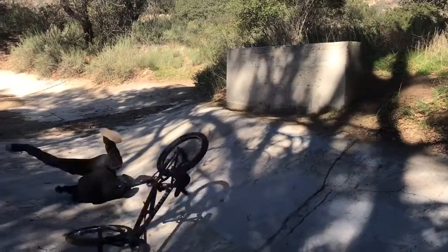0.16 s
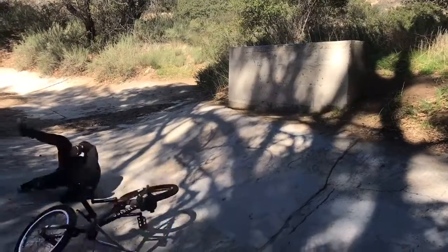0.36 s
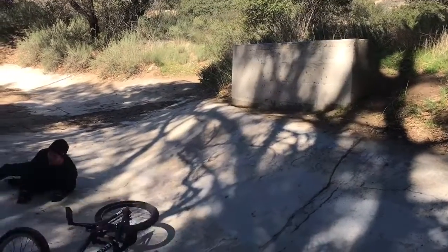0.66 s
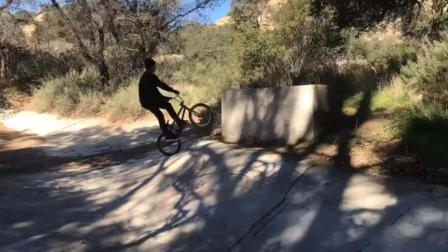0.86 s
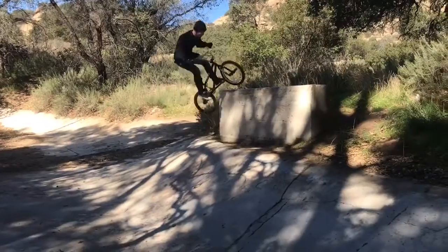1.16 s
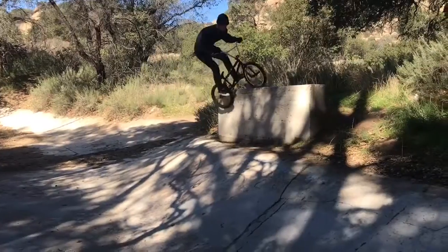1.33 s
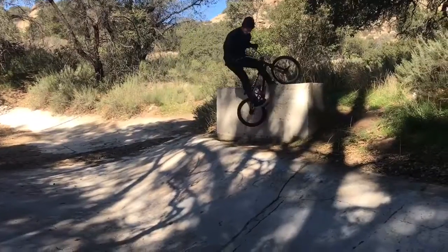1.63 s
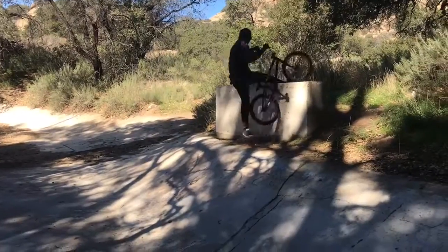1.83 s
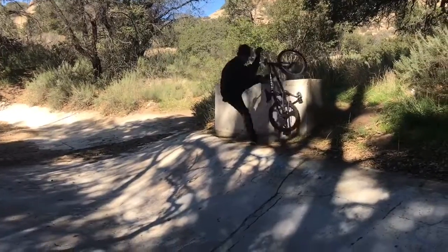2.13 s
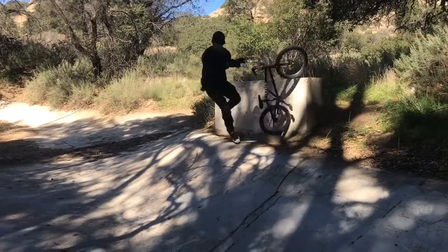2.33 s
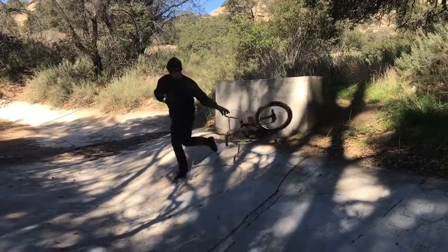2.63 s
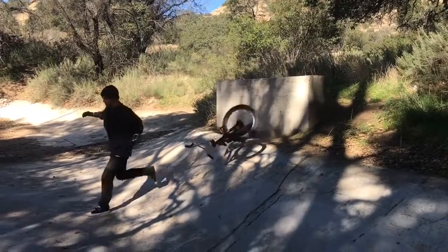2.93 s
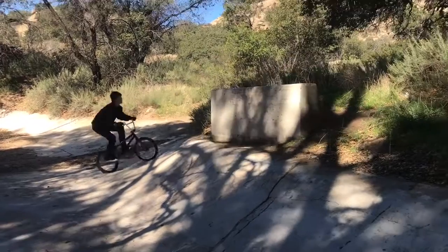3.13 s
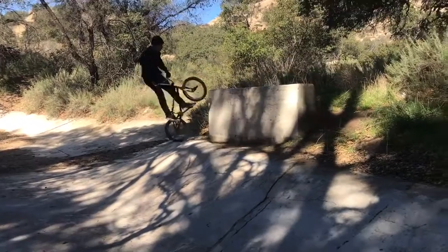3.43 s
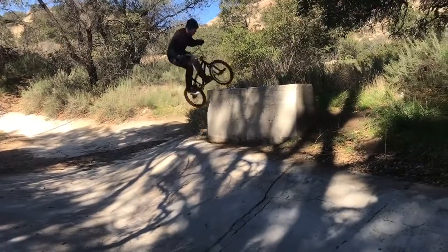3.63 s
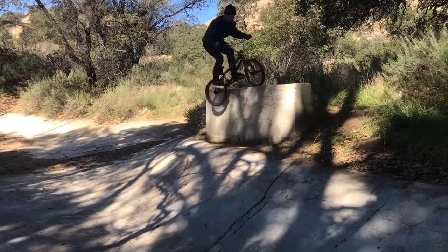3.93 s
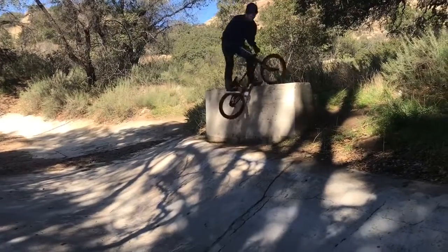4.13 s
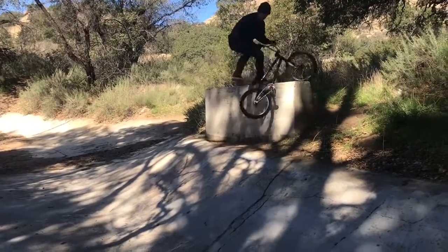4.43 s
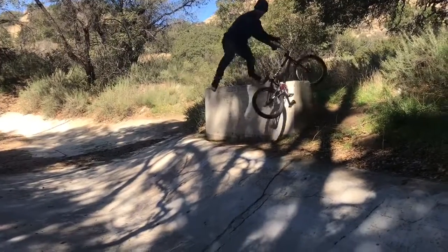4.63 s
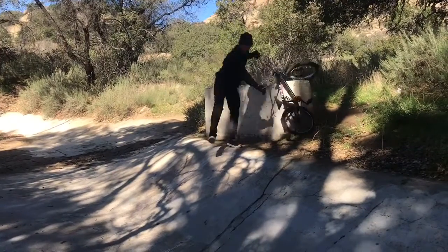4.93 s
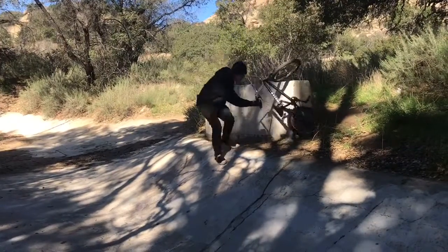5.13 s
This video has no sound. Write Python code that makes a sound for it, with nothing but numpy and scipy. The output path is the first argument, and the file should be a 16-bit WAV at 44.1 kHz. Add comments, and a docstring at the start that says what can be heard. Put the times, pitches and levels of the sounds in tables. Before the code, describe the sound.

A phone-microphone sound of a stunt bike falling on concrete outdoors, in three abruptly joined attempts. From 0 s metal grinds over crackling sand close by; sharp clacks and body thuds cluster at 0.32-0.42, with big bangs at 0.66 and 0.91 and rattling scrapes between. The level dips briefly at 0.95. From 1.14 to 1.48 a freewheel ticks quickly and faintly, speeding up; then frame and pegs clack and scrape at 1.48-1.73, with smaller knocks and a thud to 2.2. A short scuff comes at 2.35, then a quieter stretch, before a hard double clatter near 2.87, a small ping and a knock at 3.09. Another dip at 3.18, a soft low thud at 3.33, ticking at 3.53-3.87, then lighter clacks and gritty scrapes from 3.93 to 4.7, faint steel ringing, and dull little knocks at 5.1-5.2. Short concrete echo, faint breeze, low rumble and distant two-tone hum throughout.

```python
"""Stunt bike crashing in a concrete ditch

Outdoors on concrete, three attempts end in crashes: the first close by, the later ones at a ledge further off.
Frame, pegs and bars clack as bursts of filtered contacts, and grind as long runs of them over crackling sand.
Tyres, shoes and body thud and small steel parts ping as damped tones; the hub ticks in noise snaps in mid-air.
The banks answer as decaying noise, over a faint breeze, low rumble and a distant two-tone drone.
A phone's microphone colours it all."""
import sys
import numpy as np
from scipy import signal
from scipy.fft import rfft, irfft, next_fast_len
from scipy.io import wavfile
from scipy.ndimage import map_coordinates

SR = 44100
rng = np.random.default_rng(int(sys.argv[2]) if len(sys.argv) > 2 else 0)


def materialize(psi):
    """Save the field psi as 16-bit PCM at rate SR to the path in sys.argv[1].

    A 1-D psi becomes a single channel; in a 2-D psi each row is a channel.
    """
    bounded = np.clip(np.atleast_2d(psi).T, -1, 1)
    quanta = np.round(bounded * 32767).astype(np.int16)
    wavfile.write(sys.argv[1], SR, quanta)


N = 232715
TIME = np.arange(N) / SR
AGE = np.arange(SR // 2) / SR  # half a second counted from an event

# starts of the three attempts, then the end of the last: start_s
ATTEMPT_STARTS = [0, .95, 3.182, 5.3]
DIP_DB, FADE_OUT_S, FADE_IN_S = -29.5, 0.028, 0.036  # the level dips between attempts

# distant drone: time_s, deep_tone_db, upper_tone_db
DRONE_LEVELS = [(0, -47, -42.5), (.93, -62, -76), (1.0, -43.5, -49), (1.5, -39, -63.5), (3.0, -39, -53.5),
                (3.4, -47, -55), (4.6, -61, -47), (5.28, -41, -51.5)]
# spectrum shape of the breeze: frequency_hz, relative_level_db
BREEZE_SPECTRUM = [(100, -9), (260, -3), (500, -2), (800, -7), (1300, -11.5), (2000, -23), (3500, -22),
                   (6000, -33.5), (10000, -53.5), (15500, -31.5)]
# spectrum shape of the low rumble: frequency_hz, relative_level_db
RUMBLE_SPECTRUM = [(20, -40.5), (35, 1), (55, -3.5), (100, 0.5), (150, -11), (300, -16), (800, -47)]

# bike sliding or rolling on concrete:
# start_s, length_s, mid_slide_grind_db, grit_db (relative to the grind), run_out_t60_s
SLIDES = [(0, 0.21, -37, -3.5, 1), (0.326, .16, -33.5, -4, 0.874), (0.534, 0.35, -39.5, -0.5, 0.33),
          (0.828, 0.075, -37.5, -8.5, 0.323), (0.957, 0.026, -49.5, -9, .6), (1.48, 0.3, -38, -5, 0.4),
          (1.716, 0.032, -26, -11.5, 0.16), (1.852, 0.11, -45.5, -10, 0.24),
          (2.057, 0.15, -38.5, -8.5, 0.19), (2.234, 0.52, -54, -10, .4), (2.807, 0.017, -43, 0.5, 0.18),
          (2.884, 0.047, -32.5, -6.5, 0.65), (2.99, 0.18, -45.5, 4, 0.12), (3.201, 0.22, -48, -6, 0.59),
          (3.872, 0.17, -44.5, -5, 0.45), (4.197, 0.14, -37, -4.5, 0.18), (4.352, .11, -41, -8, 0.49),
          (4.625, 0.11, -46.5, -4, 0.54), (4.83, 0.043, -55.5, 5, 0.64), (5.109, 0.11, -46.5, -4.5, 0.31)]
BITE_S, SLOWING_DB_PER_S = 0.011, 5.5  # a slide bites quickly and weakens as the bike slows
# spectrum shape of metal grinding on concrete: frequency_hz, relative_level_db
GRIND_SPECTRUM = [(60, -34), (110, -7.5), (220, 0.5), (450, -7.5), (700, 0.5), (900, -1.5), (1400, -5),
                  (2400, -6), (4000, -8.5), (9000, -43)]
# spectrum shape of sand under the bike: frequency_hz, relative_level_db
GRIT_SPECTRUM = [(1200, -26.5), (2700, -13.5), (4000, -14), (5200, -1.5), (7500, -1), (10300, -6.5),
                 (12500, -2), (15500, -8.5)]
# broad resonances of frame and wheels: frequency_hz, width_hz, typical_level_db
FRAME_RESONANCES = [(293, 73, -3), (670, 200, -3), (776, 51, -18), (1200, 290, -5), (1440, 120, -11.5),
                    (1845, 270, -7), (2310, 81, -8.5), (2804, 160, -6.5), (3310, 120, -12),
                    (3815, 740, -4.5), (4530, 250, -10), (5970, 640, -11.5), (6800, 630, -17.5),
                    (9200, 2500, -9.5)]
RATTLES_PER_S, RATTLE_T60_S, RATTLE_DB = 55, 0.022, -6.5  # loose chain and cables; level relative to grind

# blows of bike on concrete:
# start_s, strength_db, struck_part_pitch_hz, chatter_t60_s (before a common scaling in clacks),
# knock_db, crack_db (both relative to the strength)
BLOWS = [(0.056, -29, 2760, .09, -9, -1.5), (0.324, -23, 970, 0.098, -31, -1.5),
         (0.347, -26, 1510, 0.091, -7, -6), (0.369, -34.5, 885, 0.0257, -4, 7.5),
         (0.4, -22, 2000, 0.01386, -15, -14.5), (0.42, -11.5, 3500, .026, -13.5, -10.5),
         (0.655, -9, 944, 0.071, -13, -4.5), (0.861, -24.5, 920, 0.15, 2, -3),
         (0.89, -32, 810, .06, 4.5, 2.5), (0.9057, -9.5, 1940, 0.066, -7.5, -9.5),
         (1.484, -17.5, 1343, .02, -16.5, -11), (1.531, -28, 900, 0.16, -4.5, -10),
         (1.564, -29.5, 1210, 0.038, -8, -7), (1.594, -20, 1110, 0.083, -10.5, -8.5),
         (1.726, -18.5, 2330, 0.036, -7, -2.5), (1.846, -24, 2060, .08, -12.5, -8),
         (1.908, -32, 2940, 0.074, -16.5, -7.5), (2.027, -34, 3330, .028, -23, -12),
         (2.038, -26.5, 870, .02, 4, -13), (2.105, -34, 1230, .042, -17, -10),
         (2.13, -31.5, 2220, 0.12, -30, -13.5), (2.171, -30, 1450, 0.027, -30, -7.5),
         (2.201, -40, 2400, .06, -15, 2), (2.616, -41, 740, 0.068, 3.5, -7),
         (2.801, -29.5, 780, 0.037, 0, -8.5), (2.86, -22.5, 796, 0.082, -2, -1.5),
         (2.872, -16, 4140, 0.051, -9, -12.5), (2.887, -16.5, 796, 0.073, -12, -8),
         (3.0941, -20.5, 714, 0.017, 5.5, -17.5), (3.93, -28.5, 1620, 0.06, -24, -12),
         (3.962, -31.5, 696, 0.055, -21, -19.5), (4.162, -37.5, 1210, 0.085, -9, -17),
         (4.194, -28.5, 2980, 0.049, -4.5, -6), (4.283, -43.5, 1110, .09, -22, 0),
         (4.301, -29.5, 1070, .035, -25, -7), (4.31, -29, 3100, .061, -10, -0.5),
         (4.323, -25.5, 2970, 0.032, -7, -8), (4.397, -34.5, 1130, .072, -11, -9.5),
         (4.439, -32, 680, 0.098, -12, -10), (4.506, -29.5, 2980, .047, -19, -9),
         (4.593, -36, 3400, 0.068, -19, -14), (4.631, -27.5, 3250, 0.1, -14, -8.5),
         (4.691, -36.5, 1900, 0.054, -33, -11), (4.831, -35.5, 2550, 0.061, -9.5, -3.5),
         (5.08, -39.5, 1090, 0.042, 4.5, -9.5), (5.102, -38, 1490, .025, -4, -12.5),
         (5.122, -36.5, 1230, .03, -3, -16.5), (5.203, -33, 1140, 0.037, 2.5, -21.5)]
# spectrum shape of the bright crack: frequency_hz, relative_level_db
CRACK_SPECTRUM = [(2500, -33), (4200, 2), (6500, 3.5), (8500, 1.5), (10300, -3.5), (12500, 0), (15500, -3)]
# short skids of rubber and metal: start_s, nominal_length_s, level_db (before the swell)
SKIDS = [(0.068, 0.014, -26), (1.249, 0.037, -52), (1.469, 0.018, -39), (1.988, 0.015, -37.5),
         (2.35, 0.041, -32), (3.622, 0.027, -50)]
REBOUND_S, REBOUND_DB, REBOUND_T60_S = .044, -20.5, 0.059  # the bike falls back after a blow
# lasting ring of the steel tubes: pitch_hz, relative_level_db, t60_s
TUBE_MODES = [(1433, -4, 0.63), (1720, -3.5, 0.79), (1890, 3.5, 0.23), (2110, -2, 0.36), (2707, -3, 0.19),
              (3700, 4, 0.45), (4300, -14, 0.74)]
# decay of the answer from the concrete banks: frequency_hz, t60_s
BANK_DECAY = [(150, 0.6), (1000, 0.57), (4000, 0.23), (14000, 0.65)]

# tyres, shoes and body landing: start_s, level_db (before the attack), pitch_hz, t60_s
THUDS = [(.322, -10.5, 322, 0.031), (.402, -17.5, 116, 0.13), (.424, -9, 143, 0.036),
         (.658, -7.5, 175, 0.038), (.664, -22, 75, .19), (.83, -25.5, 95, 0.11), (.908, -18, 220, 0.081),
         (1.732, -32, 121, 0.087), (2.056, -17, 113, 0.078), (2.778, -25, 91, 0.17),
         (2.872, -11, 147, 0.047), (3.097, -19, 216, 0.023), (3.326, -22, 73, 0.076),
         (3.937, -25, 97, 0.15), (5.102, -25, 128, 0.044), (5.126, -21, 84, .088), (5.203, -29, 70, 0.089)]
# air ringing inside a bounced tyre: start_s, level_db (before the attack)
TYRE_BOUNCES = [(0.336, -25), (0.502, -30), (0.662, -30.5), (2.873, -24.5)]
TYRE_HZ, TYRE_T60_S = 226, .55

# bike coasting through the air: start_s, length_s, hub_level_db (halfway through the spin-up)
COASTS = [(1.141, .34, -53), (3.534, .34, -53)]
SLOW_TICKS_PER_S, FAST_TICKS_PER_S, SPIN_UP_S = 38, 106, .24
TICK_RISE_DB = 6  # from slowest to fastest

# small steel parts and tubes: start_s, level_db (before the attack), pitch_hz, t60_s
PINGS = [(2.94, -25, 4860, .07), (4.632, -56.5, 4400, 3.9), (4.833, -56, 1400, 3.7),
         (4.833, -57, 1631, 1.1), (4.833, -59.5, 3914, 1.7), (5.027, -35, 7330, 0.052),
         (5.027, -42, 9120, 0.075)]

# response of the phone's microphone: frequency_hz, gain_db
MICROPHONE_RESPONSE = [(360, -1), (480, -3.5), (620, 0), (800, -0.5), (1650, -0.5), (1950, -0.5),
                       (2400, -1), (10000, -2.5), (13000, 0.5)]
TOP_HZ = 16100  # upper band limit


def amp(db):
    """Decibels to gain."""
    return 10 ** (np.asarray(db) / 20)


def unit(x):
    """Scale to rms 1."""
    return x / np.sqrt(np.mean(x ** 2) + 1e-20)


def blow(x):
    """Scale to the energy of 10 ms at rms 1."""
    return x / np.linalg.norm(x) * np.sqrt(SR / 100)


def fade(t, t60):
    """Exponential decay by 60 dB in each t60, with t60 at least .002."""
    return 1000 ** (-t / np.maximum(t60, .002))


def along(points, hz):
    """Read a curve of (Hz, value) points on a log frequency axis."""
    point_hz, value = np.transpose(points)
    return np.interp(np.log(hz + 1), np.log(point_hz + 1), value)


def curves(rows):
    """One value per sample for each column after the time."""
    time_s, *columns = np.transpose(rows)
    return [np.interp(TIME, time_s, column) for column in columns]


def wobble(rate):
    """A smooth random curve, rate knots a second."""
    knots = rng.standard_normal(int(N * rate / SR) + 4)
    return map_coordinates(knots, [TIME * rate])


def add(track, s, sound):
    """Mix a sound into a track at a time in seconds."""
    part = track[max(round(s * SR), 0):][:len(sound)]
    part += sound[:len(part)]


def colour(x, gain):
    """Causal (minimum-phase) filter with a given gain over frequency."""
    m = 2 * next_fast_len(len(x) // 2 + 2048)
    wanted = np.maximum(gain(np.fft.rfftfreq(m, 1 / SR)), 1e-6)
    cepstrum = irfft(np.log(wanted))
    # folding the cepstrum onto positive time makes the filter causal
    cepstrum[1:m // 2] *= 2
    cepstrum[m // 2 + 1:] = 0
    return irfft(rfft(x, m) * np.exp(rfft(cepstrum)))[:len(x)]


def hump(hz, centre_hz, q):
    """Gain of one broad resonance."""
    return 1 / np.hypot(1, q * ((hz + 1) / centre_hz - centre_hz / (hz + 1)))


def band(hz, low_hz, high_hz):
    """Gain of a steep band-pass."""
    return 1 / np.sqrt((1 + (low_hz / (hz + 1)) ** 10) * (1 + (hz / high_hz) ** 10))


def frame(hz, vary_db, between_db):
    """The frame's resonances, each excited more or less by the point of contact."""
    gain = amp(between_db)
    variations = rng.normal(0, 1, len(FRAME_RESONANCES)) * vary_db
    for (centre_hz, width_hz, db), variation in zip(FRAME_RESONANCES, variations):
        gain = gain + amp(db + variation) / (1 + (2 * (hz - centre_hz) / width_hz) ** 2)
    return gain


def grains(size, rate, spread_db):
    """Tiny contacts at random times with uneven sizes."""
    contact = rng.random(size) < rate / SR
    return contact * rng.standard_normal(size) * amp(spread_db * rng.standard_normal(size))


def rings(rows, attack):
    """One damped tone for each row, with a soft attack in seconds and cut after half a second."""
    out = np.zeros(N)
    for s, db, hz, t60 in rows:
        tone = np.sin(2 * np.pi * hz * AGE) * fade(AGE, t60)
        add(out, s, amp(db) * tone * (1 - np.exp(-AGE / attack)))
    return out


def drone_tone(hz, drift):
    """A distant tone wavering in pitch (drift scales it in Hz) and in level."""
    phase = 2 * np.pi * np.cumsum(hz + drift * wobble(10)) / SR
    return np.sqrt(2) * np.sin(phase) * amp(wobble(16))


def air_noise(spectrum):
    """Steady noise of rms 1 with the given spectrum shape."""
    return unit(colour(rng.standard_normal(N), lambda hz: amp(along(spectrum, hz))))


def outdoors():
    """Breeze in the scrub and low rumble are shaped noise; a far drone is two wavering tones."""
    deep_db, upper_db = curves(DRONE_LEVELS)
    deep = amp(deep_db) * drone_tone(hz=60.4, drift=0.41)
    upper = amp(upper_db) * drone_tone(hz=126.8, drift=1.05)
    return deep + upper + amp(-52.5) * air_noise(BREEZE_SPECTRUM) + amp(-44.5) * air_noise(RUMBLE_SPECTRUM)


def slide_levels():
    """Gains of grind and grit: each slide bites, weakens slowly and runs out."""
    grind_power, grit_power = np.zeros(N), np.zeros(N)
    t = TIME[:3 * SR // 2]
    for s, length, db, grit_db, t60 in SLIDES:
        slowing = amp(db - SLOWING_DB_PER_S * (t - length / 2))
        run_out = fade(np.maximum(t - length, 0), t60)
        gain = slowing * np.minimum(t / BITE_S, 1) * run_out
        add(grind_power, s, gain ** 2)
        add(grit_power, s, (gain * amp(grit_db)) ** 2)
    return np.sqrt(grind_power), np.sqrt(grit_power)


def rattle():
    """Rattle of rms 1: loose chain and cables tap the frame at random."""
    t = AGE[:SR // 20]
    taps = np.zeros(N)
    for when, size in rng.random((int(RATTLES_PER_S * N / SR), 2)):
        tap = rng.standard_normal(len(t)) * fade(t, RATTLE_T60_S)
        add(taps, when * N / SR, amp(11 * size ** 2) * tap)
    return unit(colour(taps, lambda hz: band(hz, 650, 5500) * frame(hz, vary_db=1.5, between_db=-16.5)))


def sand():
    """Grit of rms 1: each crushed grain or flicked chain link rings for a few cycles at its own pitch."""
    t = AGE[:SR // 60]
    count = int(700 * N / SR)  # 700 ticks a second
    start, pitch, life, size = rng.random((count, 4)).T[..., None]
    hz = 2400 * (15500 / 2400) ** (pitch ** 1.3)
    cycles = 5 * 8 ** life  # to fall by 60 dB
    strength = amp(7.4 * size ** 4 + along(GRIT_SPECTRUM, hz) / 2) / np.sqrt(cycles)
    ticks = strength * np.sin(2 * np.pi * hz * t) * fade(t * hz, cycles)
    where = (start * N).astype(int) + np.arange(len(t))
    return unit(np.bincount(where.ravel(), ticks.ravel(), N)[:N])


def sliding():
    """Rough concrete plucks the sliding frame and shakes its loose parts; sand crackles under it."""
    grind_gain, grit_gain = slide_levels()
    catching_db = 1.28 * wobble(110)  # the metal catches and lets go

    def grind_colour(hz):
        return amp(along(GRIND_SPECTRUM, hz)) * frame(hz, vary_db=3.5, between_db=10.0)

    def dust_colour(hz):
        return amp(along(GRIT_SPECTRUM, hz)) * frame(hz, vary_db=4.5, between_db=-6)

    grind = unit(colour(grains(N, rate=3000, spread_db=1.5), grind_colour))
    dust = unit(colour(grains(N, rate=5500, spread_db=0), dust_colour))
    grit = unit(dust + sand())
    metal = amp(catching_db) * grind + amp(RATTLE_DB) * rattle()
    return grind_gain * metal + grit_gain * amp(2.4 * catching_db) * grit


def clacks():
    """Each blow is a fast-dying chatter of contacts: a low knock, the struck part's clack and a bright crack."""
    out, t = np.zeros(N), AGE[:SR // 6]
    for s, db, pitch_hz, t60, knock_db, crack_db in BLOWS:
        # the part bites for a moment, then rebounds
        pressure = fade(np.maximum(t - .002, 0), 0.94 * t60)
        chatter = grains(len(t), rate=14000, spread_db=2) * pressure * (1 - np.exp(-t / 0.00024))
        # sand gives way a moment later
        crushed = grains(len(t), rate=12000, spread_db=0.5) * pressure * (1 - np.exp(-t / 0.00075))

        def knock_colour(hz):
            return band(hz, 181, 342) + amp(-4.5) * band(hz, 480, 850)

        def clack_colour(hz):
            struck_part = hump(hz, pitch_hz, q=0.26) + 2.3 * hump(hz, pitch_hz, q=13.3)
            return band(hz, 600, 3470) * struck_part * frame(hz, vary_db=6.0, between_db=-2.5)

        def crack_colour(hz):
            return amp(along(CRACK_SPECTRUM, hz)) * frame(hz, vary_db=6.5, between_db=-9)

        knock = amp(knock_db) * blow(colour(chatter, knock_colour))
        clack = blow(colour(chatter, clack_colour))
        crack = amp(crack_db) * blow(colour(crushed, crack_colour))
        add(out, s, amp(db) * (clack + knock + crack))
    return out


def scuffs():
    """A skid is dense grit that swells as the pressure builds, then lets go."""
    out = np.zeros(N)
    for s, length, db in SKIDS:
        contacts = grains(len(AGE), rate=6000, spread_db=0.0)
        rub = colour(contacts, lambda hz: hump(hz, 2270, q=0.62) * band(hz, 500, 9700))
        swell = np.interp(AGE / length, [0, .7, 1.3], [0, 1.3, 0])
        add(out, s, amp(db) * swell * unit(rub))
    return out


def tubes(contacts):
    """The steel tubes ring on faintly after the blows, as a sum of damped modes."""
    t = TIME[:SR]
    ring = sum(amp(db) * np.sin(2 * np.pi * hz * t) * fade(t, t60) for hz, db, t60 in TUBE_MODES)
    return amp(-32.5) * signal.fftconvolve(contacts, ring / np.linalg.norm(ring))[:N]


def banks(x):
    """The concrete banks scatter a short diffuse answer, weakened around the low mids."""
    noise = rng.standard_normal(SR // 2)
    hz, t, cells = signal.stft(noise, SR, nperseg=256)
    scatter = 1 - 0.26 * hump(hz, 690, q=0.97)
    decay = fade(t, along(BANK_DECAY, hz)[:, None])
    tail = signal.istft(cells * scatter[:, None] * decay, SR, nperseg=256)[1][:len(AGE)]
    tail = tail * (1 - np.exp(-AGE / 0.012))  # the answer builds up gradually
    return amp(-11) * signal.fftconvolve(x, tail / np.linalg.norm(tail))[:N]


def rebounds(hits):
    """Every blow returns as a weaker, blurred chatter when the bike falls back."""
    t = AGE[:SR // 10]
    chatter = grains(len(t), rate=2300, spread_db=2) * fade(t, REBOUND_T60_S)
    blurred = signal.fftconvolve(hits, chatter / np.linalg.norm(chatter))[:N]
    out = np.zeros(N)
    add(out, REBOUND_S, blurred)
    return amp(REBOUND_DB) * out


def landings():
    """Soft masses thud as damped low tones, and the air in the tyres booms on."""
    booms = [(s, db, TYRE_HZ, TYRE_T60_S) for s, db in TYRE_BOUNCES]
    return rings(THUDS, attack=0.00033) + rings(booms, attack=0.0017)


def dips():
    """Gain that falls briefly where one attempt gives way to the next."""
    gain = np.ones(N)
    for start in ATTEMPT_STARTS[1:-1]:
        gain = gain * np.interp(TIME - start, [-FADE_OUT_S, 0, FADE_IN_S], [1, amp(DIP_DB), 1])
    return gain


def freewheel():
    """The hub's pawls snap over the ratchet, faster as the cranks come to rest."""
    out, t = np.zeros(N), AGE[:SR // 25]
    for s, length, db in COASTS:
        spin = np.clip((TIME - s) / SPIN_UP_S, 0, 1)
        rate = SLOW_TICKS_PER_S + (FAST_TICKS_PER_S - SLOW_TICKS_PER_S) * spin
        in_air = (TIME > s) * (TIME < s + length)
        teeth_passed = np.floor(np.cumsum(rate * in_air) / SR)
        for i in np.flatnonzero(np.diff(teeth_passed)):
            snap = rng.standard_normal(len(t)) * fade(t, 0.031) * (1 - np.exp(-t / 0.00033))
            tick_db = db + TICK_RISE_DB * (spin[i] - 0.5) + rng.normal(0, 1)
            add(out, i / SR, amp(tick_db) * blow(snap))

    def hub_colour(hz):
        resonances = 0.072 + hump(hz, 4000, q=3.2) + .5 * hump(hz, 9000, q=3.3)
        return band(hz, 1900, 12900) * resonances

    return colour(out, hub_colour)


def pings():
    """Small steel parts and tubes sound as damped tones with a quick attack."""
    return rings(PINGS, attack=0.00024)


def scene():
    """Three attempts follow one another, each with its own rebounds, ringing and echo."""
    hits = clacks()
    contacts = hits + scuffs() + pings()
    low = landings()
    out = contacts + low + sliding() + freewheel() + outdoors()
    for start, end in zip(ATTEMPT_STARTS, ATTEMPT_STARTS[1:]):
        during = (TIME >= start) & (TIME < end)
        falling_back = rebounds(during * hits)
        ringing = tubes(during * contacts)
        echo = banks(during * (contacts + amp(1.5) * low))
        out += during * (falling_back + ringing + echo)
    return (out * dips())[None]


def record(dry):
    """The microphone colours the sound, loses the deepest bass, rounds off the loudest peaks and is band-limited."""
    coloured = colour(dry[0], lambda hz: amp(along(MICROPHONE_RESPONSE, hz)))
    bass_cut = signal.butter(3, 42, "highpass", fs=SR, output="sos")
    thin = signal.sosfilt(bass_cut, coloured)
    rounded = thin / (1 + np.abs(thin) ** 6) ** (1 / 6)
    m = next_fast_len(N + SR // 2)
    in_band = np.fft.rfftfreq(m, 1 / SR) < TOP_HZ
    return irfft(rfft(rounded, m) * in_band, m)[None, :N]


dry = scene()
out = record(dry)
materialize(out)
```